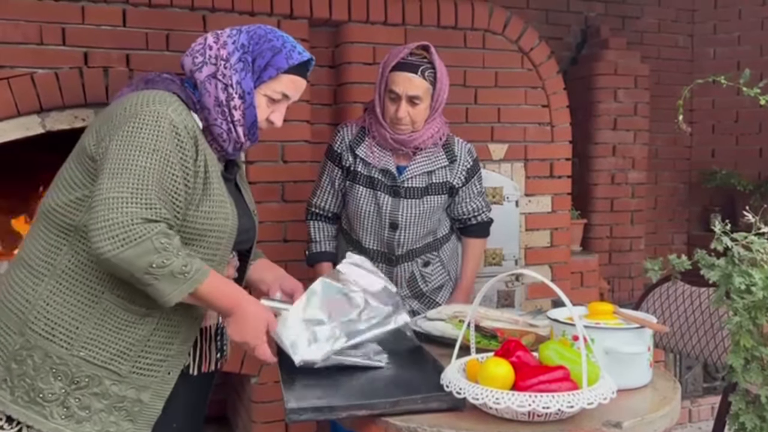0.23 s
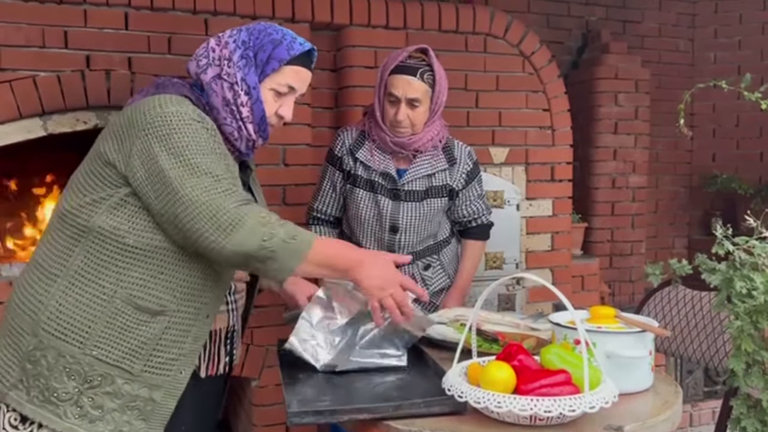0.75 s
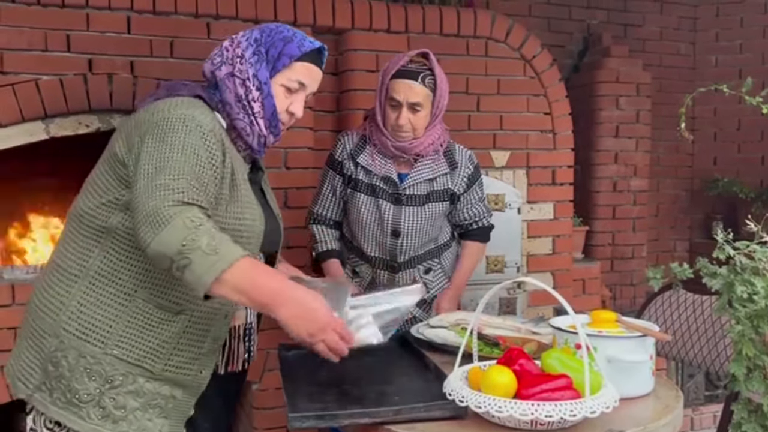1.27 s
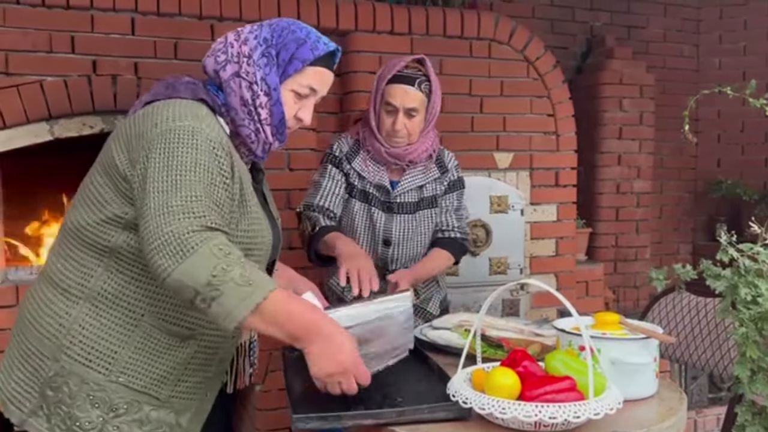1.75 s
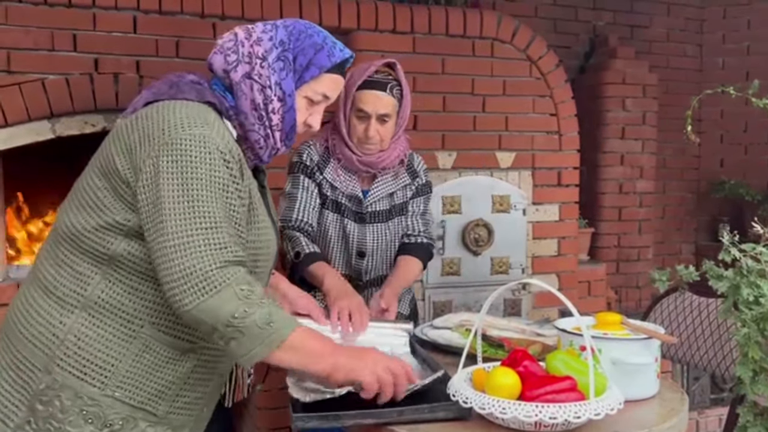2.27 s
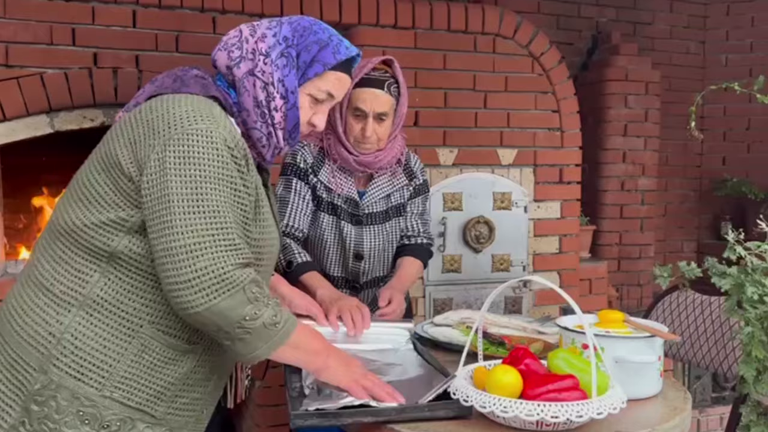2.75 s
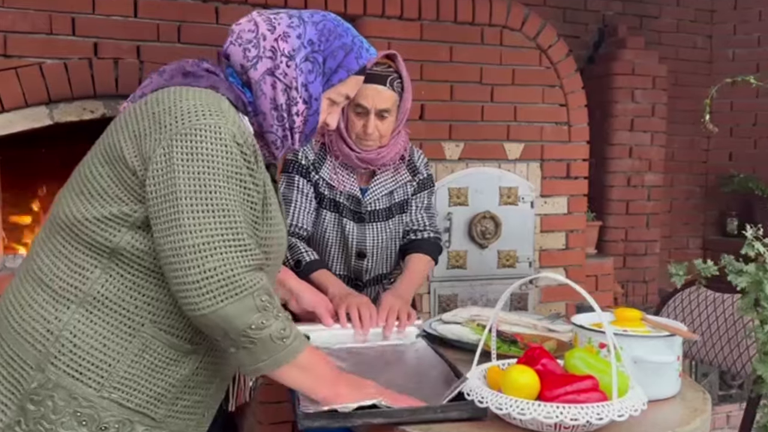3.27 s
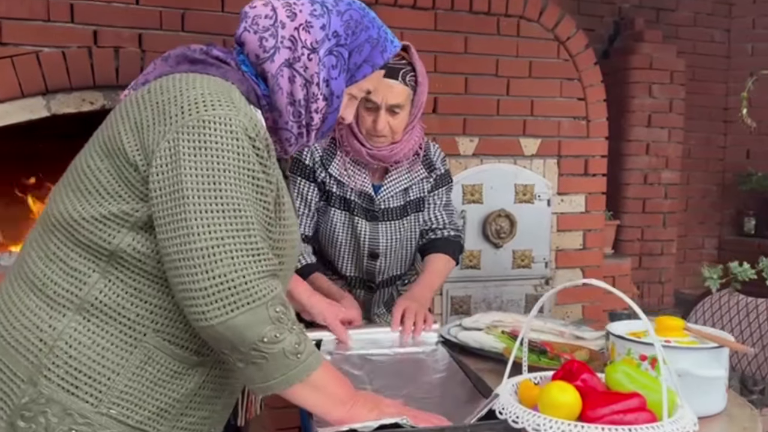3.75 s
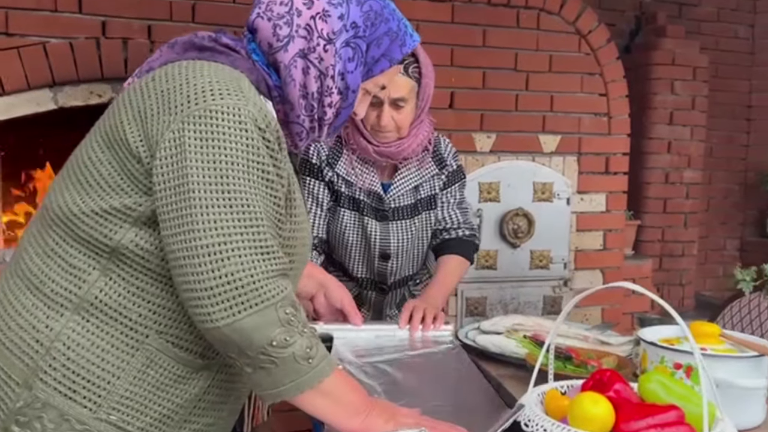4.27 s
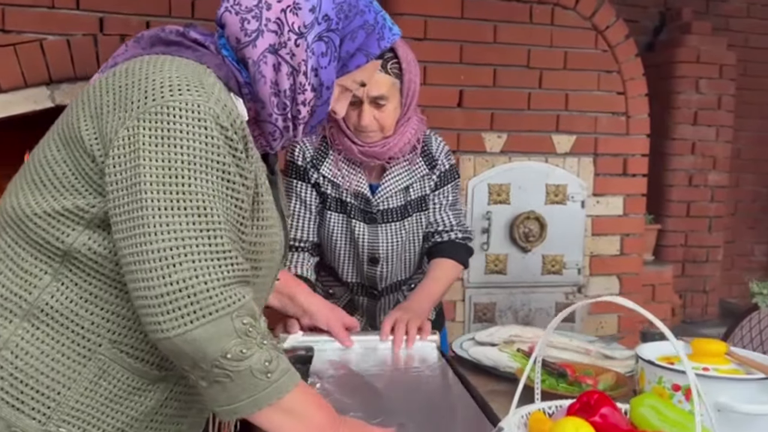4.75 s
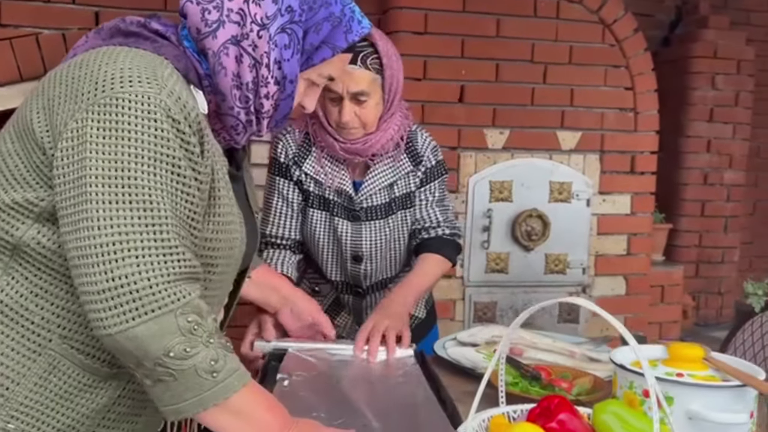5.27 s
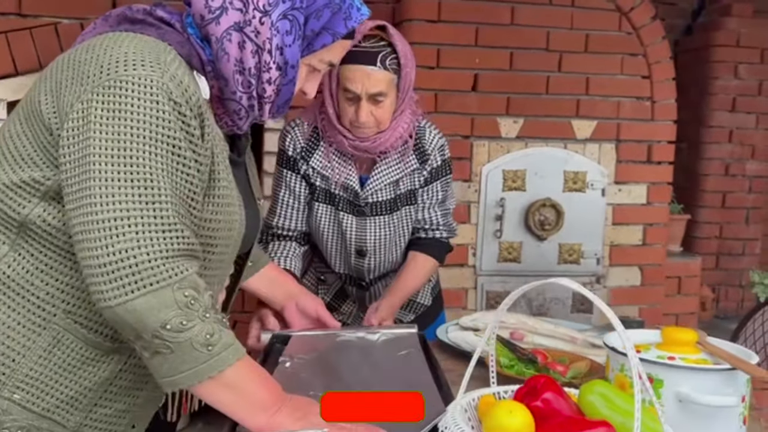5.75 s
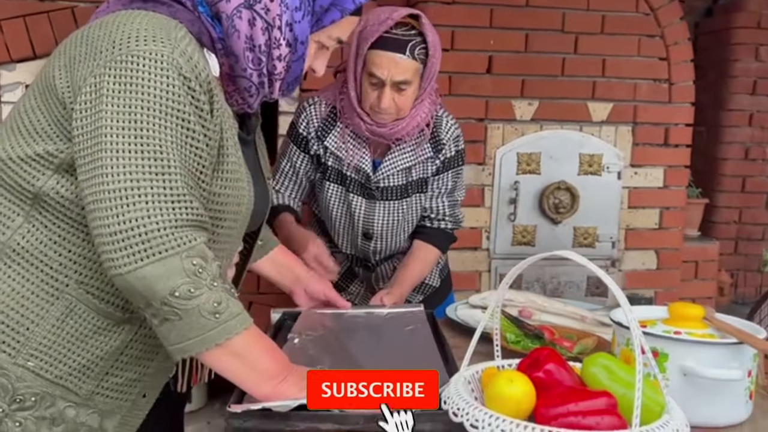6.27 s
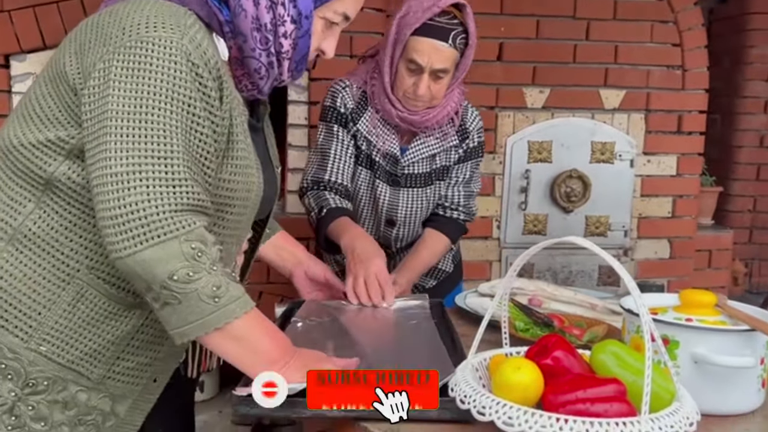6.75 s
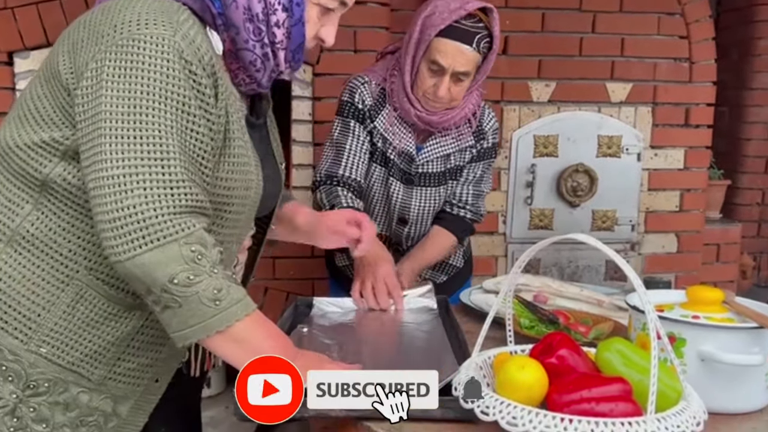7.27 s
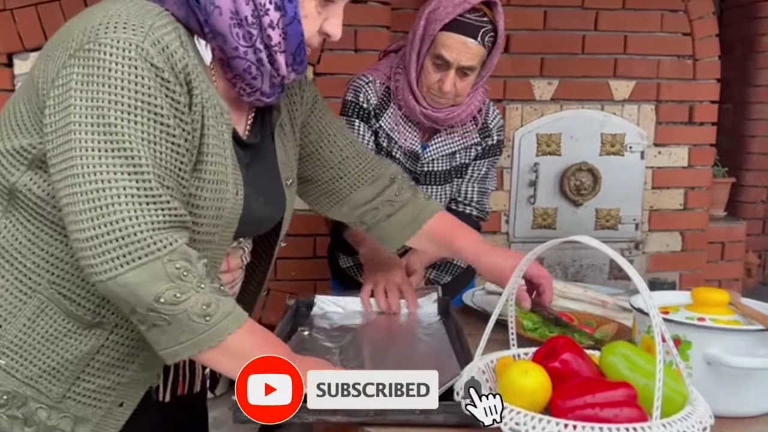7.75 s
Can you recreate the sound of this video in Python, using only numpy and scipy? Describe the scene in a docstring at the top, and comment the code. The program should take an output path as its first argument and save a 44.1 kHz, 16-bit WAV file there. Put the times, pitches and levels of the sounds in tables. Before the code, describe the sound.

A faint low table rumble and crinkling foil open the scene, with a few dull bumps around 0.1 to 0.6 s and soft falling flops at 0.3 and 0.4 s. Until about 2.4 s, foil crackles in overlapping surges, papery at first, with single snaps near 0.5, 0.8 and 1.3 s. From 2.5 to 3.2 s it is laid on the tray: strong crinkles, rounded low flops and light thuds. A deeper flop comes at 3.7 s, then clustered muffled bumps at 3.9 to 4.4 s and a hard crack near 4.5 s. From 4.8 to 6.9 s, smoothing brings brighter crackle, short dense rattles, palm rubs and scattered snaps. Low thuds bunch at 6.8 to 7.25 s; the crackle thins, then a loud flurry of sharp snaps at 7.7 to 7.9 s fades out. Close stereo, outdoors, with brief brick-wall reflections.

```python
"""First a faint rumble and a crinkle of metal foil, then dull bumps; the crackling swells with each move.
Two people unfold aluminium foil and press it into a metal baking tray on a table outdoors.
Crackle, rattle and sharp snaps are random clicks, each with its own short ring, passed through tone filters.
Rubbing is also made of clicks; the rumble is filtered noise with small taps, and bumps are fading tones.
Flops are pushes that drop in pitch. A brick oven wall throws sound back to a small stereo microphone."""
import sys
import numpy as np
from scipy import signal
from scipy.fft import rfft, irfft
from scipy.io import wavfile
from scipy.ndimage import uniform_filter1d

SR = 44100
rng = np.random.default_rng(int(sys.argv[2]) if len(sys.argv) > 2 else 0)


def store_pcm(level_fs):
    """Save levels as 16-bit WAV."""
    pcm = np.round(np.clip(level_fs, -1, 1) * 32767).astype(np.int16)
    wavfile.write(sys.argv[1], SR, np.atleast_2d(pcm).T)


N = 353625  # length in samples

# how strongly the table rumbles: t/s, level/dB
SHAKE = [(0, -46), (.3, -44.5), (.8, -55), (1.65, -52.5), (1.95, -49.5), (2.28, -53.5), (2.55, -49),
         (3.8, -51), (4.2, -48.5), (4.6, -47), (5.6, -52), (6.4, -51.5), (7.0, -45.5), (7.24, -44),
         (7.32, -55.5), (7.75, -58), (8.02, -65)]
# tone of the rumble: f/Hz, level/dB
RUMBLE_TONE = [(15, -34), (30, -20), (45, -0.5), (64, 2.5), (85, -3), (120, -7.5), (170, -18), (300, -25.5),
               (800, -52.5)]
# tone of small contacts between fingers and tray: f/Hz, level per Hz/dB
CONTACT_TONE = [(40, -18.5), (95, 1.5), (160, -2), (250, -4.5), (340, -12.5), (600, -30)]
# hands bumping the tray: t/s, level/dB, hardness (knock against thud)/dB, scaled into a tilt of the modes
BUMPS = [(0.078, -37, -5), (0.252, -29, -5), (0.29, -30, 8.5), (0.337, -32, -21), (0.607, -36, -13),
         (2.517, -32, -27), (2.899, -36, -13), (3.125, -33, -25), (3.234, -38.5, 2), (3.522, -34.5, -15),
         (3.597, -34.5, -16), (3.946, -31.5, -38), (4.008, -33.5, -12), (4.058, -34, -1.5),
         (4.122, -33, -10), (4.148, -32, -14), (4.166, -28, -17), (4.186, -26.5, -25.5),
         (4.272, -31.5, -27), (4.367, -27, -18.5), (4.394, -37, -17), (4.535, -46, 7), (5.609, -32.5, 3.5),
         (6.541, -31, -24), (6.625, -39, 4), (6.845, -30, -11), (6.946, -32.5, -18), (7.041, -27.5, -25),
         (7.105, -25.5, -30), (7.141, -23.5, -16.5), (7.164, -25, -18.5), (7.243, -26, -19)]
# ringing modes of the tray on its table, before random variation: f/Hz, level/dB, time to fade by 60 dB/s
TRAY_MODES = [(70, 8.5, 0.1), (83.5, 0.5, 0.14), (108.6, 2, 0.12), (169, 1, 0.075), (220, -5.5, 0.12),
              (276.5, -7.5, 0.1), (355, -6, 0.024), (480, -18, 0.08), (744, -32, 0.024),
              (1080, -33.5, 0.15)]
# a bulge of the sheet flops onto the tray: t/s, level/dB, starting pitch above the final pitch f/Hz
FLOPS = [(0.305, -35, 600), (0.422, -40, 330), (1.868, -44.5, 600), (1.896, -46, 400), (2.122, -40.5, 1600),
         (2.473, -38, 250), (2.736, -36, 150), (2.819, -33, 130), (2.925, -39, 330), (3.017, -37.5, 480),
         (3.726, -32, 260), (6.653, -42, 800)]
# palms sliding on the tray: start t/s, rise t/s, hold t/s, level/dB
SLIDES = [(0.18, 0.052, 0.17, -46), (2.054, 0.037, 0.014, -54.5), (2.577, 0.067, 0.04, -51.5),
          (3.215, .015, 0.06, -56.5), (4.464, 0.046, .03, -58.5), (4.921, 0.033, 0.042, -42.5),
          (5.067, 0.033, 0.085, -51), (5.602, 0.028, 0.016, -52.5), (6.603, 0.026, 0.029, -52.5),
          (7.106, 0.034, 0.027, -59), (7.25, 0.045, 0.12, -56), (7.647, 0.026, 0.08, -53.5)]
# tone of the rubbing: f/Hz, level per Hz/dB
RUB_TONE = [(90, -20.5), (190, -2.5), (300, -1.5), (400, -3.5), (520, -2.5), (750, -5.5), (1100, -12.5),
            (2500, -37.5)]
# single panels flip under a smoothing hand: t/s, level/dB, fade t/s
RUSTLES = [(4.814, -53, 0.014), (4.842, -46, 0.013), (4.925, -41, 0.031), (4.961, -43, 0.026),
           (5.03, -44, 0.0052), (5.08, -40, .012), (5.124, -42, 0.012), (5.235, -37.5, 0.012),
           (5.264, -36.5, 0.015), (5.286, -41, 0.019), (5.328, -39.5, 0.012), (5.46, -38, 0.014),
           (5.512, -37.5, 0.016), (5.607, -38, 0.015), (5.958, -49, .015), (6.076, -42, 0.03),
           (6.462, -38, 0.019), (6.72, -45, 0.024), (6.75, -38.5, 0.026), (6.901, -39, 0.017),
           (7.085, -62, 0.0085), (7.251, -38.5, 0.022)]
# tone of a flipping panel: f/Hz, level per Hz/dB
RUSTLE_TONE = [(300, -11), (700, -6), (1200, -2), (1480, -6), (1750, -0.5), (1950, 1), (2300, -1),
               (2650, 1.5), (2950, -23), (4000, -4.5), (6500, -10.5)]
# the largest folds that snap through: t/s, crack level/dB, following small creases against the crack/dB
SNAPS = [(0.54, -11, -4.5), (0.7792, -12, -13), (1.2896, -12, -24), (2.5803, -9.5, -11), (2.6387, -16, -15),
         (3.2186, -15, -14), (3.6262, -16, -6), (3.685, -19, -14), (3.9144, -11.5, -21), (4.2257, -12, -8),
         (4.3849, -21, -17), (4.483, -4.5, -9), (4.689, -19, -2), (4.8115, -10, -7), (5.03, -14, -9),
         (5.2345, -13, -10), (5.33, -16, -8), (5.4615, -16, -7), (5.608, -13, -22), (5.8948, -15, -17),
         (6.0766, -19, -13), (6.7496, -20, -13.5), (6.902, -9, -15), (7.01, -14, -20), (7.289, -17.5, -12),
         (7.3796, -19, -4), (7.5207, -19, -6), (7.6595, -19.5, -8), (7.706, -12, -14), (7.7148, -12, -23),
         (7.7298, -11, -15), (7.7314, -4, -15), (7.746, -9, -24), (7.7532, -3.5, -27), (7.8158, -11, -22),
         (7.8455, -10, -20), (7.8716, -2, -21), (7.8728, -2.5, -19)]
# tone of a sharp snap: f/Hz, level per Hz/dB
SNAP_TONE = [(300, -17.5), (1200, -31), (2300, -11), (3300, -7.5), (5200, -6), (6600, -29), (7700, -33),
             (8100, 9), (9300, -2.5), (10200, -4), (11400, -7.5)]
# tone of the deeper crack of a big fold: f/Hz, level per Hz/dB
FOLD_TONE = [(1500, -33), (2700, -1), (3500, -2), (5500, -14), (7000, -19)]
# tone of the bending sheet: f/Hz, level per Hz/dB
FLEX_TONE = [(250, -13), (550, -9.5), (850, -5.5), (1080, -2.5), (1450, -3.5), (1750, -1.5), (1950, -8),
             (2220, -1), (2700, -2.5), (3500, -4), (6000, -30.5)]
# tone of the tiny creases: f/Hz, level per Hz/dB
CREASE_TONE = [(600, -22.5), (2500, -13), (2900, -12.5), (3300, -9.5), (4400, -8.5), (5200, -7.5),
               (6400, -10), (7400, -5), (7820, -5.5), (8050, 0.5), (8600, 1), (9500, -1.1), (10050, -3.5),
               (10350, -13), (10650, -8.5), (11400, -46)]
# tautness, thinner and brighter when pressed flat: t/s, sizzle against body/dB, scaled down in use
TAUT = [(0, -6.5), (0.3, -3), (2.65, -2), (3.9, 2.5), (4.85, 2.5), (5.25, 1), (6.25, 1), (8.02, -4.5)]
# each grip, fold or press: start t/s, rise t/s, hold t/s, fine creasing level/dB, sheet bending level/dB
PRESSES = [(0, 0.0052, 0.072, -51, -49.5), (0.076, 0.11, 0.17, -35.5, -42),
           (0.435, 0.091, 0.022, -34, -41.5), (0.576, 0.017, 0.21, -37.5, -45.5),
           (0.745, 0.084, 0.026, -34, -40), (0.873, 0.037, 0.15, -33, -42), (1.11, 0.04, 0.047, -38.5, -48),
           (1.216, 0.078, 0.029, -32.5, -47), (1.351, 0.057, 0.035, -38, -48.5),
           (1.486, 0.056, 0.084, -37, -51.5), (1.688, 0.049, 0.045, -37, -50),
           (1.861, 0.095, 0.022, -36.5, -52), (2.003, 0.055, 0.31, -36, -52),
           (2.469, 0.038, 0.029, -41, -50.5), (2.56, 0.034, .1, -29.5, -43.5),
           (2.723, 0.12, 0.022, -31, -43.5), (2.872, 0.034, 0.15, -35, -50.5),
           (3.118, 0.036, .03, -41, -50.5), (3.19, 0.05, 0.065, -30.5, -48.5),
           (3.618, 0.03, 0.036, -39, -50.5), (3.776, 0.065, 0.014, -33, -51),
           (3.866, 0.033, 0.014, -36.5, -49.5), (3.936, 0.062, 0.062, -34.5, -57),
           (4.184, 0.019, 0.21, -41, -79), (4.361, 0.092, 0.045, -28, -70), (4.578, 0.12, 0.04, -32.5, -58),
           (4.805, 0.012, 0.039, -29.5, -43.5), (4.869, 0.09, 0.11, -33, -45.5),
           (5.086, 0.063, 0.028, -35.5, -44), (5.238, 0.075, 0.063, -39.5, -48),
           (5.471, 0.018, 0.04, -44.5, -45.5), (5.551, 0.04, 0.022, -36, -49.5),
           (5.747, 0.014, 0.021, -40, -50.5), (5.827, 0.069, 0.014, -31.5, -46),
           (5.931, 0.021, 0.037, -35, -47.5), (6.026, 0.056, 0.013, -33, -48.5),
           (6.142, 0.062, 0.025, -40, -46), (6.345, 0.13, 0.021, -34, -46), (6.509, 0.13, 0.056, -39, -50),
           (6.677, 0.074, 0.041, -31.5, -43), (6.812, 0.078, 0.035, -33, -45),
           (6.982, 0.041, 0.19, -34, -43.5), (7.267, 0.02, 0.064, -42.5, -49),
           (7.474, 0.018, 0.0095, -44, -70), (7.653, 0.081, 0.02, -37, -55),
           (7.791, 0.0091, 0.058, -35.5, -52.5), (7.913, 0.057, 0.014, -44, -65.5)]
# the two microphone ports: f/Hz, likeness 0-1 (capped in use), lead of the left/rad, left minus right/dB;
# lead and level difference shrink towards the bass
PORTS = [(200, 0.96, 0.09, 0.1), (650, 0.89, 0.07, 1.1), (1100, 0.69, 0.4, 3.9), (1450, 0.06, 0.92, 4.1),
         (2150, 0.8, 0.12, 0.9), (2950, 0.62, 2.72, 2.3), (3700, 0.32, 0.86, 7.2), (4700, 0.39, -0.01, 8.9),
         (6500, 0.5, 0.36, 1.2), (7450, 0.4, 1.62, 3.0), (7950, 0.88, -0.0, 3.5), (8700, 0.89, -0.15, 1.7),
         (9800, 0.64, -1.84, 0.1), (10500, 0.87, -3.02, 0.2)]

HZ = np.fft.rfftfreq(N, 1 / SR)
TIME = np.arange(N) / SR
EDGE_HZ = 11650  # upper limit of the sound
SAG_DB_PER_S, RELEASE_S = 10, 0.058  # the foil yields under a held hand, then settles
# between presses the hands keep stirring the foil, until one lets go
IDLE_CREASE_DB, IDLE_BEND_DB, LET_GO_S, LET_GO_DB = -46, -58, 7.54, -8
CONTACTS_PER_S, CONTACT_DB = 45, -9  # level against the rumble
FLOP_PEAK_S, FLOP_FALL_S, FLOP_END_HZ = 0.01, 0.009, 72.3
FLOP_ROUGH = 0.6  # how much wrinkles roughen the push, 0-1
DRAG_DB = -8.5  # a palm that bends the sheet also drags on it, this much more softly
SETTLE_DB, SETTLE_S = -13, 0.042  # neighbouring panels settle after a flip
STRAY_PER_S, STRAY_DB, STRAY_SPREAD_DB = 13, 18.5, 4  # chance ticks; level above the creasing
FOLD_DB, RUN_FADE_S = -7.5, 0.008  # deep crack level; fade of the small creases after a snap


def amp(db):
    """Turns decibels into gain."""
    return 10 ** (np.asarray(db) / 20)


def unit(x):
    """Scales a signal to an rms of 1."""
    return x / np.sqrt(np.mean(x ** 2) + 1e-20)


def read(table, hz, axis=1):
    """Reads one column of a table, joined up over log frequency."""
    table = np.array(table)
    return np.interp(np.log(hz + 1), np.log(table[:, 0] + 1), table[:, axis])


def curve(table, axis):
    """Reads one column of a table, joined up over time."""
    table = np.array(table)
    return np.interp(TIME, table[:, 0], table[:, axis])


def add(mix, s, sound):
    """Mixes a sound in at time s, in seconds."""
    part = mix[max(round(s * SR), 0):][:len(sound)]
    part += sound[:len(part)]


def colour(x, tone, size=4096):
    """Filters with unit energy and no sound ahead of a click: minimum phase from the wanted tone."""
    log_gain = np.log(amp(read(tone, np.fft.rfftfreq(size, 1 / SR))))
    circle = np.concatenate([log_gain, log_gain[-2:0:-1]])
    response = np.exp(np.conj(signal.hilbert(circle)))
    taps = np.fft.ifft(response).real[:size // 2]
    taps = taps / np.linalg.norm(taps)
    return signal.oaconvolve(x, taps[None], axes=1)[:, :N]


def wobble(rate_hz):
    """Makes a slow random drift of rms 1 by smoothing noise."""
    noise = rfft(rng.standard_normal(N))
    return unit(irfft(noise / (1 + (HZ / rate_hz) ** 4), N))


def spread(clicks, near_s, wet_db, t60, count, crisp_db=-20, size=1024):
    """Several spots crackle at once and soon move on; each has a crisp edge, a short ring and echoes."""
    t, out = np.arange(2 * size) / SR, np.zeros((2, N))
    spot, frames = rng.integers(0, count, N), N // size + 4
    near = unit(np.exp(-t / near_s)) ** 2
    echo = unit(amp(-60 * t / t60)) ** 2 * amp(wet_db) ** 2
    crisp = unit(np.exp(-t / 0.00008)) ** 2 * amp(crisp_db) ** 2
    fade = near + echo + crisp  # as power
    for k in range(count):
        lead = k * size // count
        padded = np.pad(clicks * (spot == k), (lead, frames * size - N - lead))
        pieces = padded.reshape(frames, size)
        # every stretch of clicks gets its own ring, which spills into the next two stretches
        rings = rng.standard_normal((2, frames, len(t))) * np.sqrt(fade)
        rings /= np.linalg.norm(rings, axis=2, keepdims=True)
        rung = irfft(rfft(pieces, 3 * size) * rfft(rings, 3 * size))
        parts = np.split(rung, 3, axis=2)
        joined = sum(np.roll(part, late, axis=1) for late, part in enumerate(parts))
        out += joined.reshape(2, -1)[:, lead:lead + N]
    return out


def buckles(per_s, size_db):
    """Makes random clicks of either sign and uneven size, with mean power 1."""
    chance = np.clip(per_s / SR, 1e-5, 1)
    size = amp(size_db * np.minimum(rng.exponential(1, N), 3)) * rng.choice([-1, 1], N)
    # dividing by the square root evens out the power where clicks are sparse
    return unit(size * (rng.random(N) < chance) / np.sqrt(chance))


def avalanches(per_s, fade_s, steady):
    """One buckle sets off its neighbours: a gain that jumps and dies away, of mean power 1."""
    kicks = (rng.random(N) < per_s / SR) * rng.uniform(0.35, 2.8, N)
    power = signal.lfilter([1], [1, -np.exp(-1 / (fade_s * SR))], kicks)
    return unit(np.sqrt(steady + power / power.mean()))


def stroke(start, rise, hold):
    """One move of a hand: the force builds, sags while it is held, and dies away."""
    t = TIME - start
    build = np.clip(t / rise, 0, 1)
    held = amp(-SAG_DB_PER_S * np.clip(t - rise, 0, hold))
    release = np.exp(-np.clip((t - rise - hold) / RELEASE_S, 0, 20))
    return build * held * release


def handling():
    """Adds the power of all presses to the idle stirring: fine creasing and sheet bending, in dB."""
    idle = amp(LET_GO_DB * np.clip((TIME - LET_GO_S) / RELEASE_S, 0, 1))
    work = (idle * amp(IDLE_CREASE_DB)) ** 2
    bend = (idle * amp(IDLE_BEND_DB)) ** 2
    for start, rise, hold, crease_db, bend_db in PRESSES:
        power = stroke(start, rise, hold) ** 2
        work = work + power * amp(crease_db) ** 2
        bend = bend + power * amp(bend_db) ** 2
    return 10 * np.log10(work), 10 * np.log10(bend)


def rumble():
    """The jostled table gives low filtered noise, with small finger contacts that follow its level."""
    noise = unit(colour(rng.standard_normal((2, N)), RUMBLE_TONE))
    taps = buckles(per_s=CONTACTS_PER_S, size_db=1.5)[None]
    contacts = colour(taps, CONTACT_TONE) * amp(CONTACT_DB)
    return (noise + contacts) * amp(curve(SHAKE, axis=1))


def bumps():
    """Soft blows ring fading modes of tray and table; hard ones favour high modes, low modes build slower."""
    t, out = np.arange(SR // 3) / SR, np.zeros(N)
    hz, level, t60 = np.array(TRAY_MODES).T[:, :, None]
    for s, db, hard_db in BUMPS:
        tilt = 0.57 * (hard_db + 15.5) * np.log2(hz / 120)
        weight = amp(level + tilt + 2 * rng.standard_normal(hz.shape))
        weight = weight / np.linalg.norm(weight)
        pitch = hz * rng.uniform(1.0, 1.05, hz.shape)
        swing = np.sin(2 * np.pi * pitch * t) * rng.choice([-1, 1], hz.shape)
        build = (1 - np.exp(-t * hz / 0.2)) ** 2
        add(out, s, amp(db) * (weight * amp(-60 * t / t60) * build * swing).sum(0))
    return np.array([out, out])


def flops():
    """A bulge lands with a rounded, uneven push whose pitch drops quickly to a thud."""
    t, out = np.arange(SR // 10) / SR, np.zeros(N)
    swell = (t / FLOP_PEAK_S * np.exp(1 - t / FLOP_PEAK_S)) ** 2
    for s, db, hz in FLOPS:
        pitch = FLOP_END_HZ + hz * np.exp(-t / FLOP_FALL_S)
        turns = np.cumsum(pitch) / SR + rng.random()
        wrinkles = rng.standard_normal((2, 64))
        # the roughness changes once per turn of the wave
        grain = np.interp(turns, np.arange(wrinkles.shape[1]), wrinkles[0] + 1j * wrinkles[1])
        rough = np.sqrt(1 - FLOP_ROUGH ** 2) + FLOP_ROUGH * grain
        push = rough * np.exp(2j * np.pi * turns)
        add(out, s, amp(db) * swell * push.real)
    return np.array([out, out])


def palms(bend_db):
    """Palms drag over foil and tray: many small clicks whose level wavers."""
    drag = amp(bend_db + DRAG_DB) ** 2
    for start, rise, hold, db in SLIDES:
        drag = drag + (amp(db) * stroke(start, rise, hold)) ** 2
    waver = amp(0.22 * wobble(rate_hz=22))
    rub = buckles(per_s=900, size_db=3.0) * np.sqrt(drag) * waver
    return colour(spread(rub, near_s=0.0012, wet_db=-1.5, t60=0.26, count=2), RUB_TONE)


def rustles():
    """A panel flips over in one short, dense rattle, and its neighbours settle after it."""
    t, level = np.arange(SR // 5) / SR, np.zeros(N)
    for s, db, fade_s in RUSTLES:
        flip = np.exp(-(t / fade_s) ** 2)
        settle = amp(SETTLE_DB) * np.exp(-t / SETTLE_S)
        onset = 1 - np.exp(-t / 0.0011)
        add(level, s, amp(db) * onset * np.maximum(flip, settle))
    clicks = level * buckles(per_s=1800, size_db=-0.5)
    return colour(spread(clicks, near_s=0.00085, wet_db=-1.5, t60=0.063, count=3), RUSTLE_TONE)


def snaps(work_db):
    """Folds give way with a crack and a run of small ones; big ones sound deeper, stray ones tick by chance."""
    t = np.arange(SR // 6) / SR
    stray_db = work_db + STRAY_DB - STRAY_SPREAD_DB * rng.random(N)
    clicks = (rng.random(N) < STRAY_PER_S / SR) * amp(stray_db)
    for s, db, run_db in SNAPS:
        hits = rng.choice([-1, 1], len(t)) * (rng.random(len(t)) < 2000 / SR)
        run = amp(run_db) * hits * np.exp(-t / RUN_FADE_S)
        run[0] = 1  # the crack itself
        add(clicks, s, amp(db) * run)
    crack = 0.85 * clicks + spread(0.28 * clicks, near_s=0.004, wet_db=-3, t60=0.06, count=2)
    # multiplying a click by its own size makes big folds stand out in the deep part
    body = spread(clicks * abs(clicks), near_s=0.0012, wet_db=-10, t60=0.05, count=1)
    return colour(crack, SNAP_TONE) + amp(FOLD_DB) * colour(body, FOLD_TONE)


def sheet(surge, bend_db):
    """Larger panels flip over with a lower, papery rattle, sparse when the sheet is barely bent."""
    flutter = unit(np.sqrt(surge) * avalanches(per_s=37, fade_s=0.012, steady=2.3))
    clicks = buckles(per_s=1100 * amp(0.8 * (bend_db + 46)), size_db=-0.5)
    clicks = clicks * flutter * amp(bend_db)
    rung = spread(clicks, near_s=0.0046, wet_db=-6.5, t60=0.073, count=3, crisp_db=-6)
    return colour(rung, FLEX_TONE)


def creases(surge, work_db):
    """Tiny creases buckle in avalanches; hard work sets off more of them, and taut foil sounds brighter."""
    effort_db = work_db + 39
    clicks = buckles(per_s=1700 * amp(0.7 * effort_db), size_db=2) * surge * amp(work_db)
    rung = spread(clicks, near_s=0.004, wet_db=-1, t60=0.1, count=4, crisp_db=0)
    crackle = colour(rung, CREASE_TONE)
    # split at 7600 Hz into sizzle above and body below
    sizzle = irfft(rfft(crackle) / (1 + (7600 / (HZ + 1)) ** 20), N)
    body = crackle - sizzle
    bright_db = curve(TAUT, axis=1) + 0.22 * effort_db
    return sizzle * amp(0.19 * bright_db) + body * amp(-0.65 * bright_db)


def uneven_colour(x, depth_db, size=256):
    """Uneven colour: random patches of time and pitch grow louder or softer."""
    overlap = size * 3 // 4
    z = signal.stft(x, nperseg=size, noverlap=overlap)[2]
    patches = rng.standard_normal(z.shape[:0:-1]).T  # the same for both channels
    patches = uniform_filter1d(patches, size=3, axis=0)
    patches = unit(uniform_filter1d(patches, size=13, axis=1))
    gain = unit(amp(depth_db * patches))
    return signal.istft(z * gain, nperseg=size, noverlap=overlap)[1][:, :N]


def ports(pair):
    """Two close microphone ports agree in timing and level in the bass, and differ in both higher up."""
    a, b = rfft(pair)
    like = np.clip(read(PORTS, HZ, axis=1), 0, 0.97)
    short_waves = 1 - np.exp(-(HZ / 600) ** 2)
    lead = short_waves * read(PORTS, HZ, axis=2)
    side = amp(short_waves * read(PORTS, HZ, axis=3) / 2)
    right = (like * a + np.sqrt(1 - like ** 2) * b) * np.exp(-1j * lead)
    both = np.array([a * side, right / side])
    return irfft(both / np.sqrt((side ** 2 + side ** -2) / 2), N)


def scene():
    """Brings foil, hands, tray and table together at the microphone."""
    work_db, bend_db = handling()
    surge = avalanches(per_s=60, fade_s=0.01, steady=6)
    foil = uneven_colour(creases(surge, work_db) + sheet(surge, bend_db), depth_db=1.3)
    wide = rumble() + palms(bend_db) + rustles() + snaps(work_db) + foil
    # bumps and flops are the same in both channels
    return ports(wide) + bumps() + flops()


def record(dry):
    """A steep low-pass filter ends the sound at EDGE_HZ."""
    taps = signal.firwin(511, EDGE_HZ, window=("kaiser", 9), fs=SR)
    return signal.oaconvolve(dry, taps[None], "same")


dry = scene()
out = record(dry)
store_pcm(out)
```